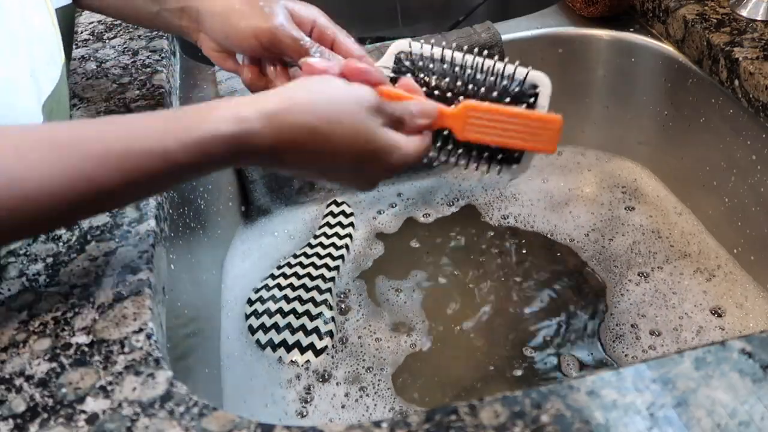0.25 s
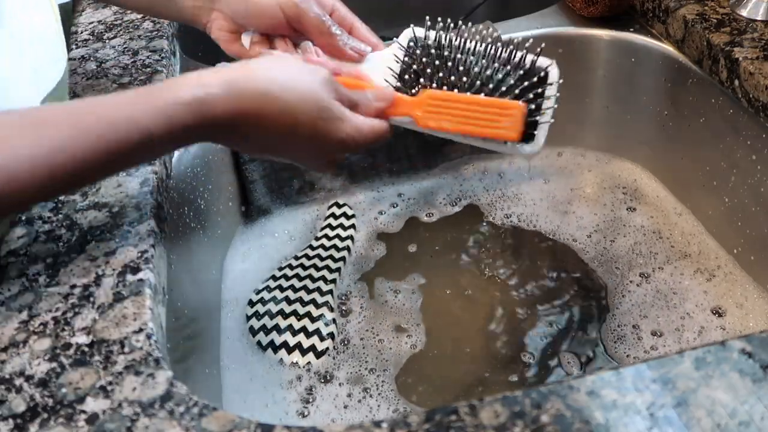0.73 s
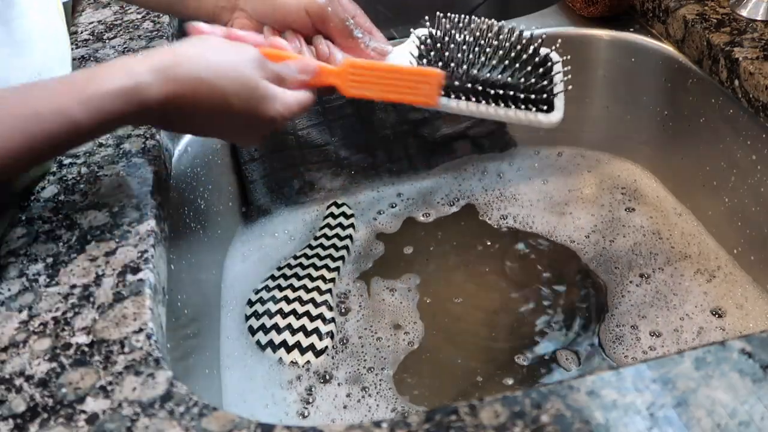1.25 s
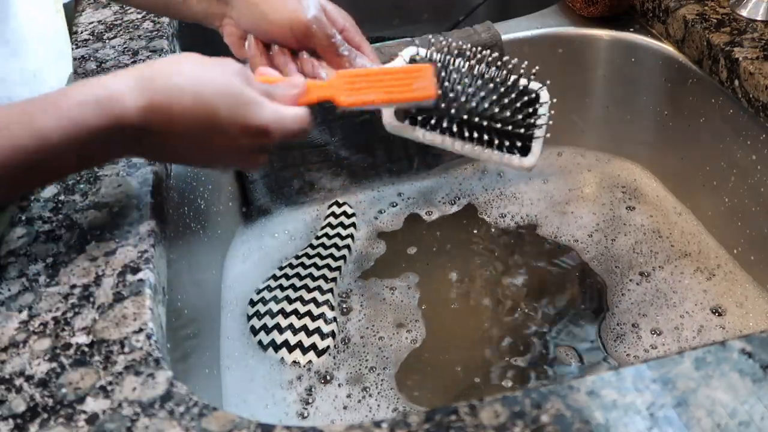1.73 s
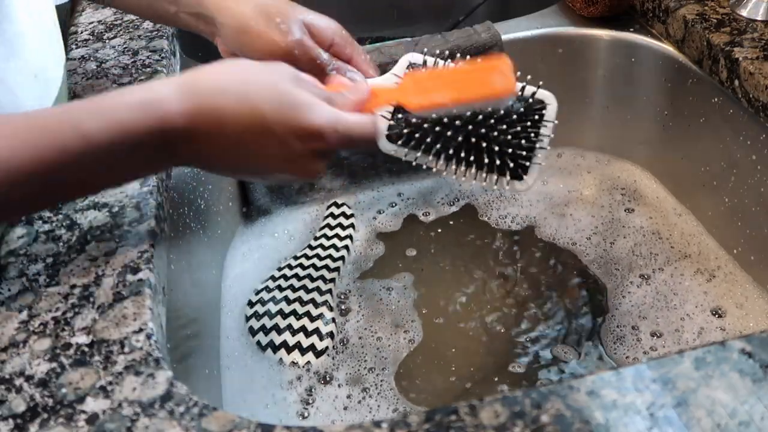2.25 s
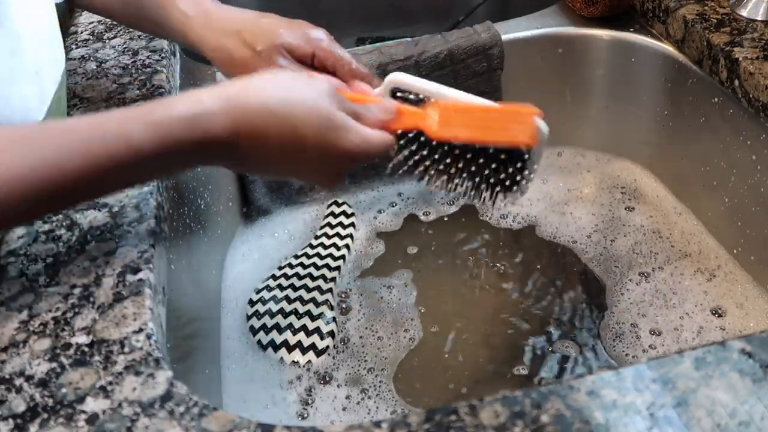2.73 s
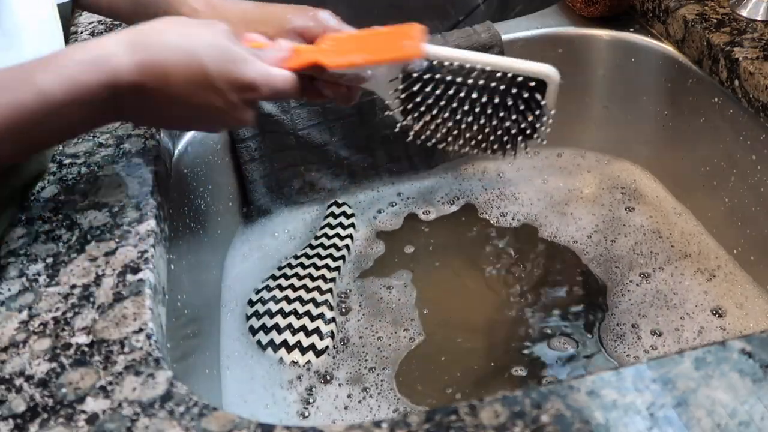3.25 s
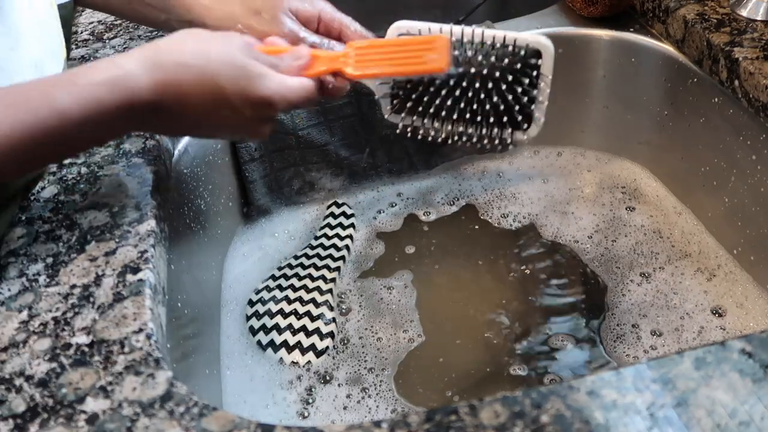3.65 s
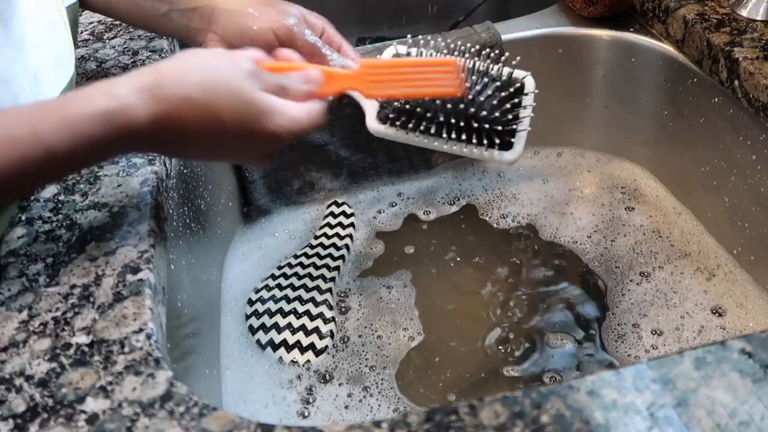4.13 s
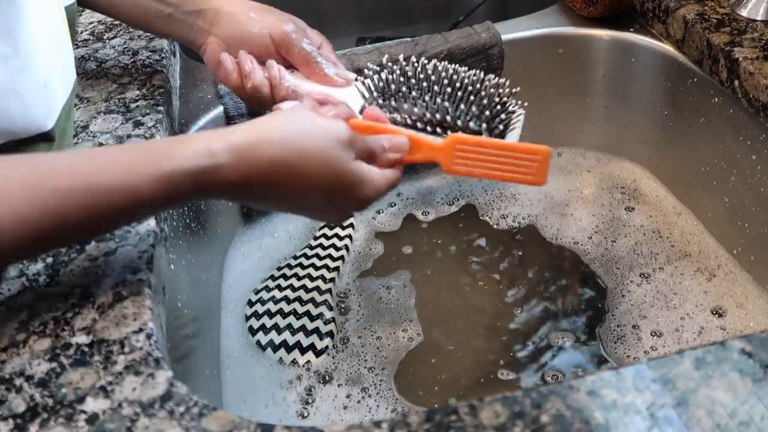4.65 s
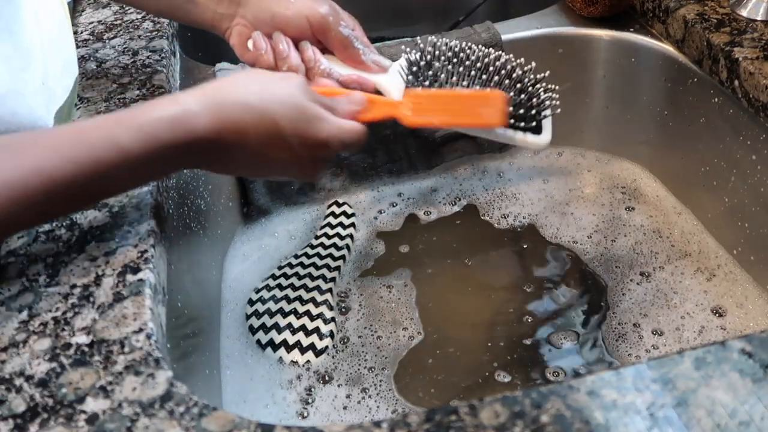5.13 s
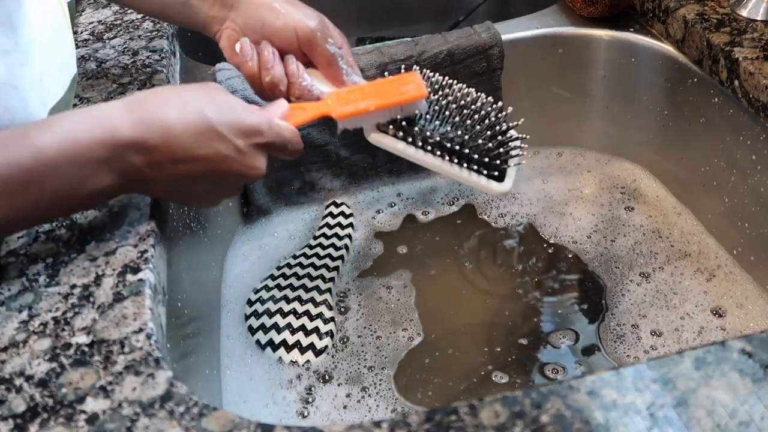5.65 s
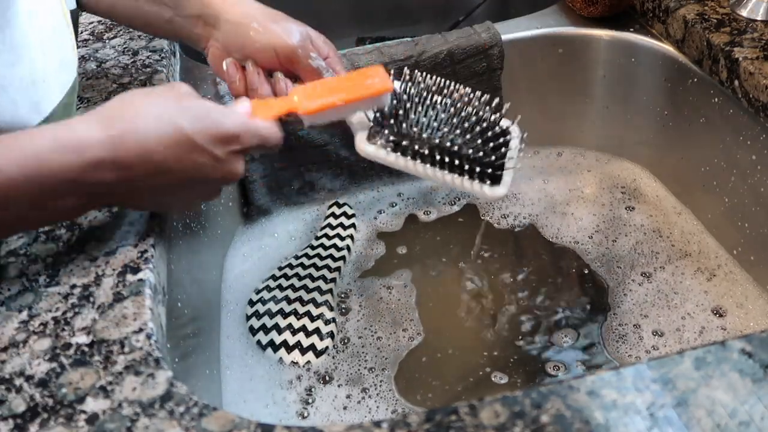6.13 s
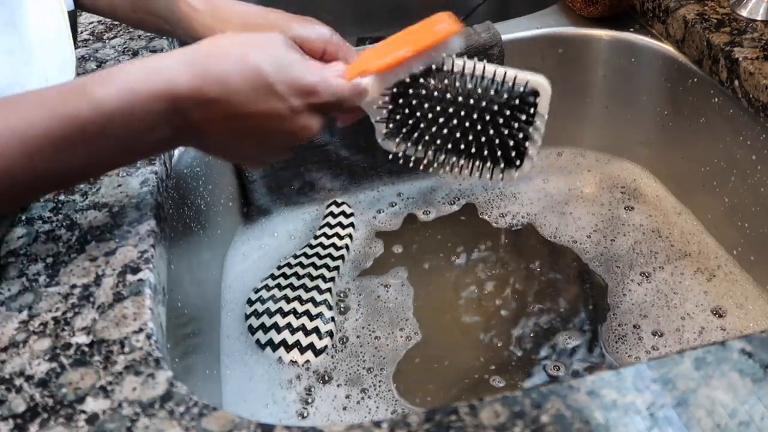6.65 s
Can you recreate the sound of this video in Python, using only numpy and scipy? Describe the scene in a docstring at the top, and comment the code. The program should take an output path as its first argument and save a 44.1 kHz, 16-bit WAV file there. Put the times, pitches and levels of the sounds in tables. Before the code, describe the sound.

Close, brisk rasping of bristles over springy hairbrush pins, about two to three strokes a second, clattering lightly above quiet kitchen hum.

```python
"""At a steel kitchen sink a stiff nail brush scrubs the pins of a wet paddle hairbrush in short strokes.
Bristle snaps are dense random impulses filtered to their colour; plucked pins, frame and handle are damped
modes, and the hollow cushion is a resonator whose pitch is set stroke by stroke. Landings knock in clicks
that swell and fade, and a few drops tick. A wavering fan hum and a low rumble are narrow bands of noise, over
room air of coloured noise. Two close microphone ports hear a common sound and a difference in the treble."""
import sys
import numpy as np
from scipy import signal
from scipy.fft import rfft, irfft
from scipy.io import wavfile
from scipy.ndimage import uniform_filter1d

SR = 44100
rng = np.random.default_rng(int(sys.argv[2]) if len(sys.argv) > 2 else 0)


def bounce(signal):
    """Save signal as a 16-bit WAV file at the path given by the first command-line argument."""
    frames = np.transpose(np.atleast_2d(signal))
    limited = np.clip(frames, -1, 1)
    pcm = np.round(limited * 32767).astype(np.int16)
    wavfile.write(sys.argv[1], SR, pcm)


N = 304290

# Spectrum of the bristle snaps common to both ports: (frequency [Hz], level [dB])
SNAP_SPECTRUM = [(590, -14.5), (1000, -0.5), (1440, -4), (3120, 2), (4310, -0.5), (5500, 2.5), (7010, -4),
                 (10200, -7.5), (16000, -6.5)]
# Modes of the hairbrush pins: (frequency [Hz], bandwidth [Hz], level [dB])
PIN_MODES = [(1650, 110, 10.5), (2330, 79, 13.5), (3106, 160, 9.5), (3060, 470, 13.5), (3760, 100, 10),
             (3984, 35, 9), (4200, 53, 4), (4580, 110, 6), (5400, 61, -2), (5580, 74, 7), (6000, 92, -7)]


def gain_of(db):
    """Amplitude ratio of a level: 20 dB is a factor of ten."""
    return 10 ** (np.asarray(db) / 20)


def evened(x):
    """Normalisation of the mean power: scales to rms 1."""
    return x / np.sqrt(np.mean(x ** 2) + 1e-20)


def read(points, hz):
    """Spectral interpolation, linear along a logarithmic frequency axis."""
    f, value = np.transpose(points)
    return np.interp(np.log(hz + 1), np.log(f + 1), value)


def colour(points):
    """Minimum phase: the log spectrum alone fixes a causal response, here of energy 1."""
    hz = abs(np.fft.fftfreq(8192, 1 / SR))
    log_gain = np.log(gain_of(np.maximum(read(points, hz), -100)))
    # The Hilbert transform of the log gain supplies the phase.
    spectrum = np.exp(np.conj(signal.hilbert(log_gain)))
    taps = np.fft.ifft(spectrum).real[:4096]
    return taps / np.linalg.norm(taps)


def ring(modes):
    """Modal superposition: a struck solid answers as a sum of damped sines, here of energy 1."""
    t = np.arange(4096) / SR
    taps = np.zeros(len(t))
    for hz, width_hz, db in modes:
        decay = np.exp(-np.pi * width_hz * t)
        taps += gain_of(db) * np.sqrt(width_hz) * decay * np.sin(2 * np.pi * hz * t)
    return taps / np.linalg.norm(taps)


def through(x, taps):
    """Linear filtering: convolution with a response, cut to the scene's length."""
    return signal.fftconvolve(x, taps)[:N]


def wander(length_s):
    """Slow random fluctuation of rms 1: noise smoothed twice by a moving average."""
    size = max(round(length_s * SR), 1)
    once = uniform_filter1d(rng.standard_normal(N), size)
    return evened(uniform_filter1d(once, size))


def ticks(per_s, spread_db):
    """Stick-slip as a random impulse train of rms 1: many small slips, a few large."""
    size = gain_of(spread_db * np.minimum(rng.exponential(1, N), 5))
    signed = size * rng.choice([-1., 1.], N)
    return evened(signed * (rng.random(N) < per_s / SR))


def contact(hz, rise_s):
    """Brief contact as a wave packet: a few cycles that swell and fade."""
    t = np.arange(400) / SR
    envelope = (t / rise_s * np.exp(1 - t / rise_s)) ** 2
    return envelope * np.sin(2 * np.pi * hz * t)


def resonate(x, hz, width_hz):
    """Resonance at a moving pitch: shifts the curve hz down to zero, smooths, and shifts back."""
    turn = np.exp(2j * np.pi * np.cumsum(hz) / SR)
    r = np.exp(-np.pi * width_hz / SR)
    smooth = signal.lfilter([1], [1, -r], x / turn)
    return np.sqrt(2 - 2 * r ** 2) * (turn * smooth).real  # keeps the rms of a broad drive


def hum():
    """Narrow-band noise: steep bands around each fan tone make it waver."""
    # Fan tones: (frequency [Hz], width at half amplitude [Hz], rms level [dB])
    fan_tones = [(68, 12, -64), (122.1, 13, -55.5), (208, 32, -48), (342, 49, -58)]
    hz = np.fft.rfftfreq(N, 1 / SR)
    noise = rfft(rng.standard_normal(N))
    out = np.zeros(N)
    for f, width_hz, db in fan_tones:
        band = noise / (1 + (2 * (hz - f) / width_hz) ** 2)
        out += gain_of(db) * evened(irfft(band, N))
    return out


def rumble():
    """Amplitude modulation of band noise: a low rumble swells and sinks."""
    # Course of the rumble: (time [s], level [dB])
    rumble_course = [(0, -47.5), (1.95, -44.5), (2.25, -58.5), (3.3, -49.5), (4.05, -46), (4.25, -61),
                     (5.2, -52), (6.9, -45.5)]
    # Spectrum of the rumble: (frequency [Hz], level [dB])
    rumble_spectrum = [(25, -27), (40, 0), (60, 10), (100, 3.5), (140, -4), (200, -43)]
    s, db = np.transpose(rumble_course)
    hz = np.fft.rfftfreq(N, 1 / SR)
    shaped = rfft(rng.standard_normal(N)) * gain_of(read(rumble_spectrum, hz))
    return evened(irfft(shaped, N)) * gain_of(np.interp(np.arange(N) / SR, s, db))


def background():
    """Superposition of independent sources: room air as coloured noise, fan hum and rumble."""
    # Spectrum of the room air: (frequency [Hz], level [dB])
    air_spectrum = [(76, -29.5), (130, -11.5), (241, -6), (307, -7.5), (463, -13), (1320, -22), (2000, -27),
                    (5000, -36.5), (11300, -50), (16000, -68)]
    air = gain_of(-47.5) * through(rng.standard_normal(N), colour(air_spectrum))
    return air + hum() + rumble()


def tail():
    """Reverberation: noise whose bands decay exponentially at their own speed, energy 1."""
    # Decay of the kitchen: (frequency [Hz], time to fall by 60 dB [s])
    kitchen_decay = [(200, 0.48), (1000, 0.15), (4000, 0.5), (12000, 0.51)]
    hz, t, z = signal.stft(rng.standard_normal(SR // 2), SR, nperseg=256)
    decay = gain_of(-60 * t / read(kitchen_decay, hz)[:, None])
    taps = signal.istft(z * decay, SR, nperseg=256)[1]
    taps[:90] = 0  # a 2 ms gap ahead of the tail
    return taps / np.linalg.norm(taps)


def drops():
    """Short oscillation: each drop ticks for a few cycles, with a smaller, higher tick."""
    # Drops into the basin: (time [s], level [dB], bubble pitch [Hz])
    drop_list = [(.62, -34.5, 2740), (2.285, -48, 1300), (2.622, -31, 2880), (3.42, -34, 2240),
                 (5.058, -41, 1700), (5.825, -41, 1770), (6.29, -50, 914)]
    out = np.zeros(N)
    for s, db, hz in drop_list:
        tick = contact(hz, 2.2 / hz) + gain_of(-9) * contact(1.4 * hz, 1.1 / hz)
        out[round(s * SR):][:400] += gain_of(db) * tick
    return out


def strokes():
    """Friction under changing load: landing, light drag, bite, sweep and lift set each layer's gain."""
    # One row a stroke: (landing time [s], landing level [dB], drag level [dB],
    #  wait until the bristles bite [s], snap level at the bite [dB],
    #  sweep length [s], snap level at the lift [dB],
    #  cushion thrum above the snap at the bite [dB], the same at the lift [dB],
    #  frame ring above the snap on landing [dB], the same in the sweep [dB],
    #  cushion pitch [Hz], thud above the thrum [dB], pin plucks above the snap [dB])
    stroke_list = [ (-.08, -43, -46, 0.063, -35, 0.11, -36, -8, -9.5, -4, -4.5, 323, -2, -4.5),
                   (0.287, -40, -74, 0.073, -31, .14, -33.5, -4.5, -2, -1, -5.5, 308, -4, -4),
                   (0.724, -43.5, -45, 0.056, -33.5, .14, -32.5, -13, -17.5, -4, -10, 304, -3, -9.5),
                   (1.118, -38.5, -59, 0.067, -33, 0.13, -35.5, -10.5, -12.5, -6, -5, 298, -3, -0.5),
                   (1.536, -41, -48.5, 0.06, -30, 0.16, -36.5, -13, -6, -1, -9, 315, -2, -6),
                   (1.933, -33.5, -44, 0.067, -30, 0.14, -33, -2, -7, 3, -7, 317, -8.5, -8),
                   (2.334, -35, -56, 0.06, -31, .12, -33.5, -10.5, -6.5, 1, -8.5, 340, -7, -13),
                   (2.713, -38.5, -58, 0.059, -32, 0.14, -33.5, -10, 5, -18, -11, 331, -35, -7),
                   (3.102, -33.5, -53, 0.064, -35.5, 0.13, -30, -7.5, -10, -16, -10.5, 301, -4.5, -13),
                   (3.539, -36.5, -59, 0.047, -31.5, 0.13, -34.5, -4, -7.5, 8, -12, 308, -2, -23),
                   (3.92, -34.5, -48, 0.043, -30, 0.17, -36.5, -10, -8, 0, -8.5, 315, 3.5, -9.5),
                   (4.3, -50, -44.5, 0.068, -31.5, 0.13, -34.5, -12, -8.5, -8, -9, 314, -34, -21),
                   (4.692, -38, -46, 0.066, -35.5, 0.11, -34, -9, -37, -2, -11.5, 349, -22, -31),
                   (5.098, -39, -49, 0.059, -30.5, 0.14, -38, -19, -5, -6, -6.5, 320, -4, -12.5),
                   (5.504, -35, -45, 0.052, -29, 0.17, -45, -27, -7, 3, -3.5, 293, -19, -8),
                   (5.905, -64, -42, 0.11, -39, 0.14, -37, -4, -2, 1.5, -6.5, 309, -4, -6.5),
                   (6.597, -59, -43.5, 0.093, -32, 0.13, -43, -9, -15, -2.5, -10, 378, 0, -5), ]
    touch_s, stroke_s = .004, .6  # rise of the landing; longest span of a stroke
    settle, creep, lift_off = 467, 313, 271  # dB/s: landing dies, snaps grow to the bite, snaps thin out
    step_db, arch_db = 9, 3  # the snaps jump up at the bite and bulge in mid sweep
    unload_s, unload = .063, 248  # s after the lift; dB/s by which the body then falls faster than the snaps
    landing_thrum_db = -6  # cushion above the snap while the brush lands and drags
    gains, cushion_hz = np.zeros((5, N)), np.zeros(N)
    for (s, land_db, drag_db, wait, bite_db, length, lift_db, thrum_db, late_db,
         rap_db, frame_db, hz, thud_db, pluck_db) in stroke_list:
        first = max(round(s * SR), 0)
        bite, lift = s + wait, s + wait + length
        t = np.arange(first, min(round((s + stroke_s) * SR), N)) / SR
        landing = gain_of(land_db - settle * (t - s)) + gain_of(drag_db) * (t < bite)
        along = np.clip((t - bite) / length, 0, 1)  # 0 at the bite, 1 at the lift
        sweep_db = bite_db + (lift_db - bite_db) * along + arch_db * np.sin(np.pi * along)
        sweep_db -= lift_off * np.maximum(t - lift, 0)
        sweep_db -= (step_db + creep * (bite - t)) * (t < bite)
        sweep = gain_of(sweep_db)
        loaded = sweep * gain_of(-unload * np.maximum(t - lift - unload_s, 0))
        # Landing and sweep add in power.
        snap = np.hypot(landing, sweep)
        sweep_thrum = gain_of(thrum_db + (late_db - thrum_db) * along) * loaded
        thrum = np.hypot(gain_of(landing_thrum_db) * landing, sweep_thrum)
        frame = np.hypot(gain_of(rap_db) * landing, gain_of(frame_db) * loaded)
        layers = [snap, gain_of(pluck_db) * snap, thrum, gain_of(thud_db) * thrum, frame]
        gains[:, first:first + len(t)] += np.clip((t - s) / touch_s, 0, 1) * layers
        cushion_hz[first:] = hz
    return gains, cushion_hz


def knocks():
    """Impact excitation: each knock is a clatter of clicks, a jolt that rings the pins, and body pushes."""
    # Knocks of the brush head and strong pin snaps: (time [s], click level [dB], click pitch [Hz],
    #  cushion push above the click [dB], frame push above the click [dB])
    knock_list = [(0.2906, -22.5, 3330, -14, -18), (0.7267, -26, 2210, -16, -15),
                  (0.7369, -18, 3320, -8, -23), (0.7966, -14, 3700, -24, -18),
                  (0.8417, -15.5, 3120, -25, -21), (1.1215, -25.5, 3910, -17, -20),
                  (1.186, -23, 3900, -20, -22), (1.2, -15, 3900, -30, -21),
                  (1.539, -13.5, 3100, -22.5, -20), (1.5529, -14, 3100, -7, -22),
                  (1.6045, -11.5, 3000, -21, -24), (1.9356, -10, 2960, -29, -18),
                  (1.9477, -9, 2330, -12, -15), (2.0095, -15, 4000, -4, -23), (2.042, -21, 4570, -15, -17),
                  (2.058, -24, 3180, -18, -19), (2.3349, -19.5, 2920, -18, -20),
                  (2.3484, -18, 3100, -14, -21), (2.3927, -18, 3720, -11, -25),
                  (2.7212, -18.5, 3600, -24, -23), (2.7684, -17, 4280, -17, -22),
                  (2.8084, -15, 3680, -17, -19), (3.105, -24.5, 2700, -16, -27),
                  (3.159, -24, 2100, -16, -21), (3.1843, -24, 3820, -17, -24),
                  (3.1922, -16, 3900, -26, -24), (3.5462, -21.5, 3310, -2, -15),
                  (3.5863, -21.5, 2570, -11, -17), (3.929, -12, 3400, -23, -19),
                  (3.9659, -17, 3230, -9, -18), (4.3021, -25, 3180, -20, -20),
                  (4.3171, -18.5, 3220, -22, -20), (4.373, -19, 3100, -25, -18),
                  (4.6967, -22, 3910, -20, -4.5), (4.7186, -33.5, 3710, -11, 16),
                  (4.871, -25.5, 2540, -29, -27), (5.0972, -27.5, 3900, -17, -18),
                  (5.1558, -14, 3800, -25, -11), (5.1946, -12.5, 3730, -23, -11),
                  (5.4993, -24, 2270, -6, -14), (5.5141, -10.5, 3240, -13.5, -14),
                  (5.5501, -12, 3090, -27, -5), (5.9081, -18, 3080, -16, -19), (6.041, -21, 3070, -16, -22),
                  (6.5981, -20.5, 2380, -15, -19)]
    # Repeated touches within a knock: (delay [s], level [dB])
    touches = [(0, -3.5), (.0013, -5.5), (.0027, -9.5)]
    crack_db = -17  # sharp first contact, relative to the ringing pins
    click, jolt, *blows = np.zeros((4, N + 800))
    t = np.arange(400) / SR
    push = gain_of(-11.52) * (t / 0.00023) * np.exp(1 - t / 0.00023)  # soft, peaks at 0.23 ms
    detune = np.exp(0.066 * rng.standard_normal((len(knock_list), len(touches))))
    detune[:, 0] = 1  # the first touch keeps the listed pitch
    for (s, db, hz, *body_db), factors in zip(knock_list, detune):
        for (delay_s, touch_db), factor in zip(touches, factors):
            start = round((s + delay_s) * SR)
            click[start:][:400] += gain_of(db + touch_db) * contact(hz * factor, .0005)
        jolt[round(s * SR) + 20] = gain_of(db + 3.0)
        for blow, above_db in zip(blows, body_db):
            blow[round((s + .0015) * SR):][:400] += gain_of(db + above_db) * push
    struck = ring(PIN_MODES) + gain_of(crack_db) * colour(SNAP_SPECTRUM)
    return click[:N] + through(jolt, struck), np.array(blows)[:, :N]


def body(thrum, thud, frame, cushion_hz, blow):
    """Forced resonance: slips and blows shake the hollow cushion, the handle and the plastic frame."""
    # Modes of hand and handle: (frequency [Hz], bandwidth [Hz], level [dB])
    handle_modes = [(135, 12, -4.5), (214, 63, 8)]
    # Modes of the plastic frame: (frequency [Hz], bandwidth [Hz], level [dB])
    frame_modes = [(653.6, 49, 12), (916, 173, 10), (1053, 20, 2)]
    cushion = resonate(thrum * ticks(300, 2.5) + blow[0], cushion_hz, width_hz=28)
    handle = through(thud * ticks(400, 1.0) + gain_of(-6) * blow[0], ring(handle_modes))
    plastic = through(frame * ticks(700, 2.45) + blow[1], ring(frame_modes))
    return cushion + handle + plastic


def catches(snap):
    """Stick-slip of single tufts catching pins: sparse short ticks at eight pitches."""
    out = np.zeros(N)
    for hz in np.geomspace(2000, 5800, num=8):
        out += through(snap * ticks(35, 3.), contact(hz, 1.4 / hz))  # 35 per second at each pitch
    # The whole stands 9 dB below the snap envelope.
    return gain_of(-9) * out / np.sqrt(np.mean(out ** 2) / np.mean(snap ** 2))


def bristles(snap, pluck, spectrum):
    """Impulsive excitation: a dense fizz of snaps, and plucked pins ringing at their own pitch."""
    snaps_per_s, plucks_per_s = 9000, 500  # plucks for each pin mode
    pin_clump_db, pin_clump_s = 4, .018  # a row of like pins sings for a moment, then another
    out = through(snap * ticks(snaps_per_s, 1.5), colour(spectrum))
    share = gain_of([db + read(spectrum, hz) for hz, width_hz, db in PIN_MODES])
    share /= np.linalg.norm(share)
    for mode, gain in zip(PIN_MODES, share):
        hz, width_hz, db = mode
        singing = gain_of(pin_clump_db * np.clip(wander(pin_clump_s), -2, 1.5))
        plucks = pluck * singing * ticks(plucks_per_s, 4.2)
        out += gain * through(plucks, ring([(hz, width_hz, db)]))
    return out


def scene():
    """Sum and difference stereophony: each port faces other bristles, so the treble differs."""
    # Spectrum of the snaps, left minus right: (frequency [Hz], level [dB])
    snap_apart = [(600, -45.5), (1300, -21), (1800, -34), (2300, -44), (3200, -4.5), (3800, -8), (6450, 0),
                  (9000, -3), (12400, 0.5), (15900, -17)]
    # Spectrum of the air that differs between the ports: (frequency [Hz], level [dB])
    air_apart = [(24, -46), (40, -24), (400, -8), (1470, -19), (4110, -24), (4900, -25), (12400, -35),
                 (13300, -37), (15900, -43)]
    clump_db, clump_s = 1.5, .0052  # tufts cross the rows of pins unevenly: depth, length
    sum_top_hz = 11177  # above this only the port difference is heard
    port_lag = 0.039  # lag of the left port behind the right [samples]
    gains, cushion_hz = strokes()
    snap, pluck, thrum, thud, frame = gains * gain_of(clump_db * wander(clump_s))
    click, blow = knocks()
    solid = body(thrum, thud, frame, cushion_hz, blow) + click + catches(snap) + drops()

    near = bristles(snap, pluck, SNAP_SPECTRUM) + solid
    both = near + gain_of(-9) * through(near, tail()) + background()
    low_pass = signal.ellip(8, .5, 60, min(sum_top_hz, SR / 2.1), fs=SR, output="sos")
    both = signal.sosfilt(low_pass, both)

    edge = bristles(snap, gain_of(-9.0) * pluck, snap_apart)
    edge += gain_of(-4) * through(click, colour(snap_apart))
    apart = gain_of(-2) * (edge + gain_of(-8) * through(edge, tail()))
    apart += gain_of(-29.0) * through(solid, tail())
    apart += gain_of(-58) * through(rng.standard_normal(N), colour(air_apart))
    apart -= port_lag / 2 * np.gradient(both)  # a small delay is a share of the slope
    return np.array([both + apart, both - apart])


def record(dry):
    """Band limitation: bass cut of the microphone, then the upper limit of the recorder."""
    bass_cut_hz, edge_hz = 42, 15900
    thin = signal.sosfilt(signal.butter(2, bass_cut_hz, "high", fs=SR, output="sos"), dry)
    band_limit = signal.firwin(511, edge_hz, window=("kaiser", 9), fs=SR)
    return signal.oaconvolve(thin, band_limit[None], "same")


dry = scene()
out = record(dry)
bounce(out)
```